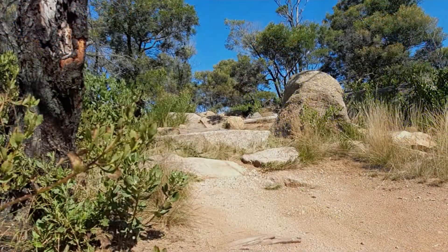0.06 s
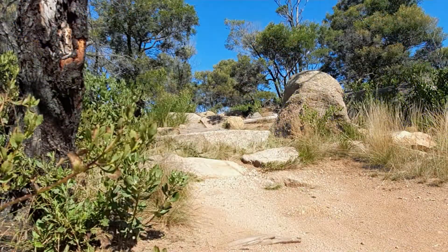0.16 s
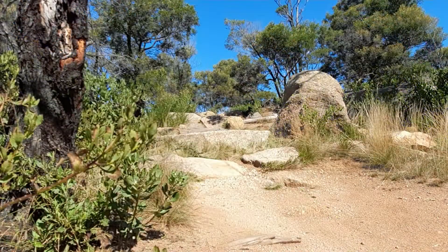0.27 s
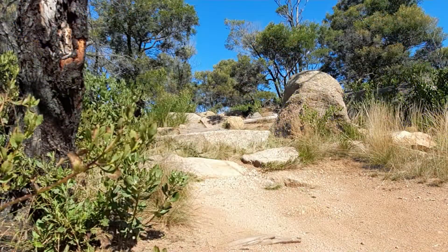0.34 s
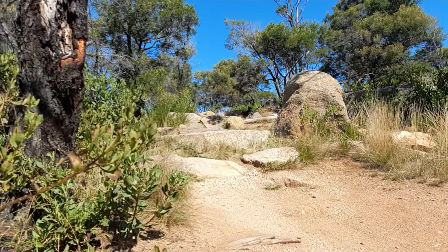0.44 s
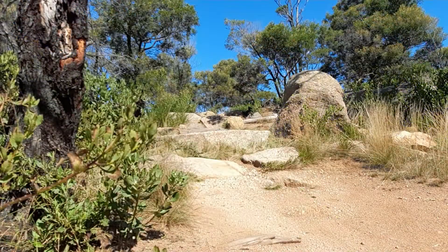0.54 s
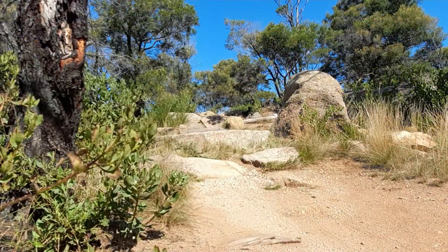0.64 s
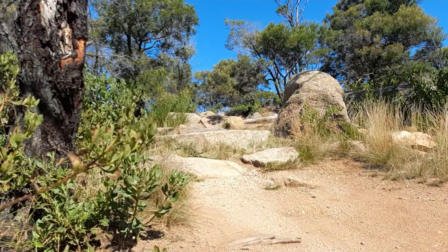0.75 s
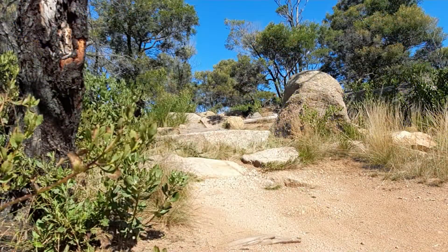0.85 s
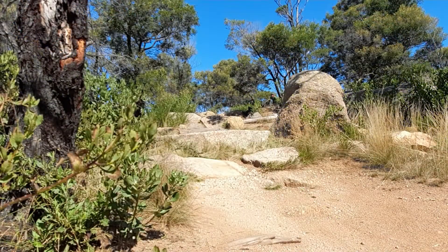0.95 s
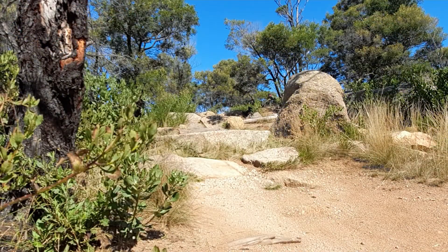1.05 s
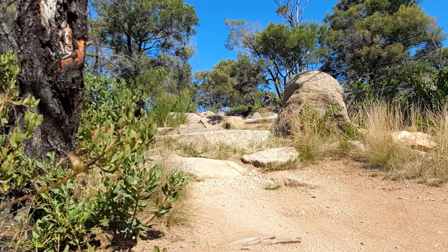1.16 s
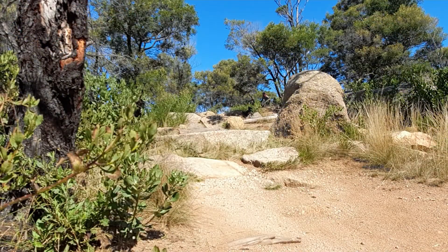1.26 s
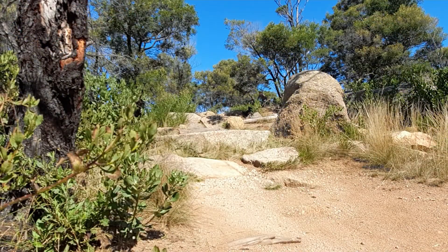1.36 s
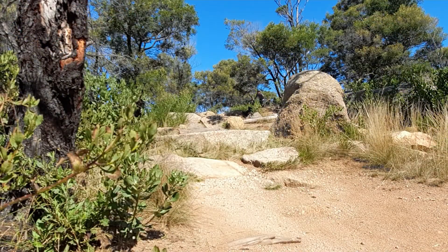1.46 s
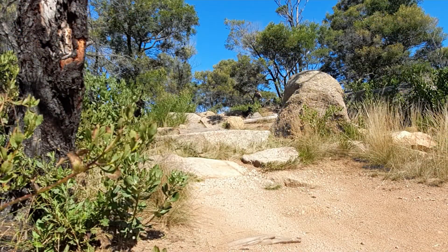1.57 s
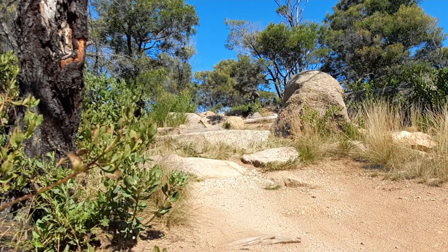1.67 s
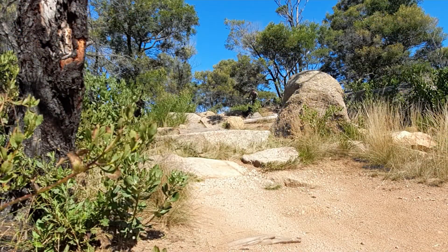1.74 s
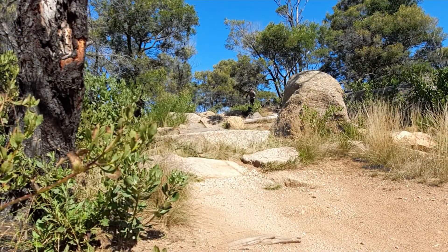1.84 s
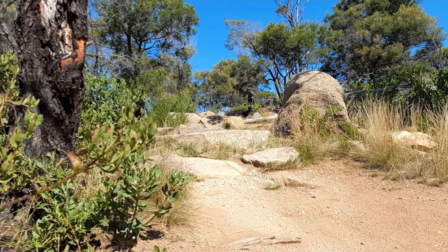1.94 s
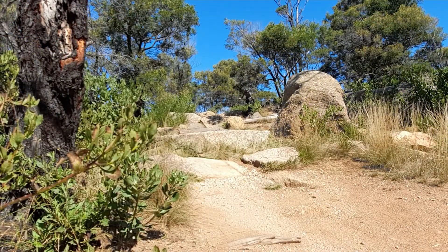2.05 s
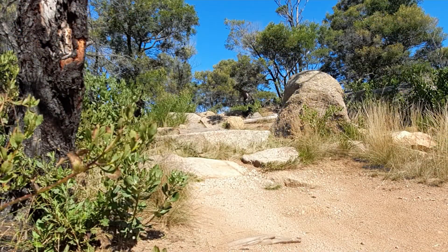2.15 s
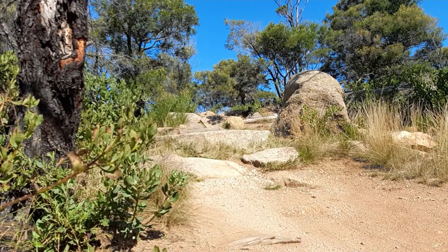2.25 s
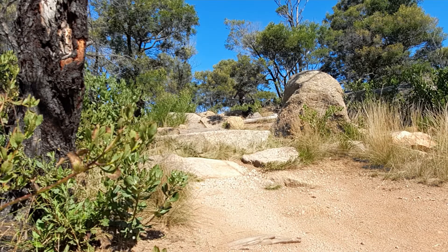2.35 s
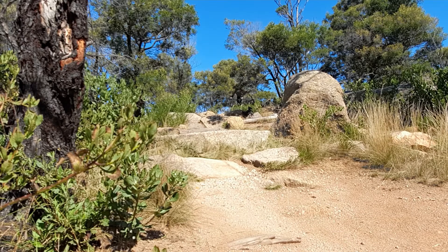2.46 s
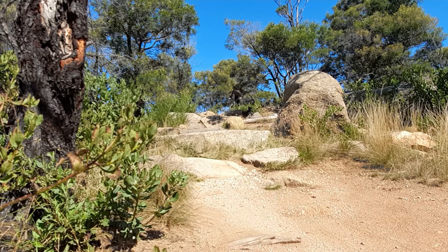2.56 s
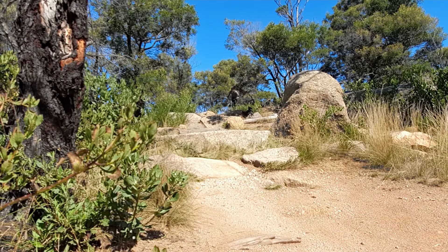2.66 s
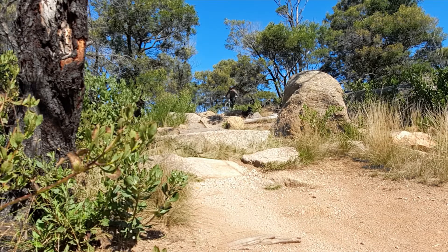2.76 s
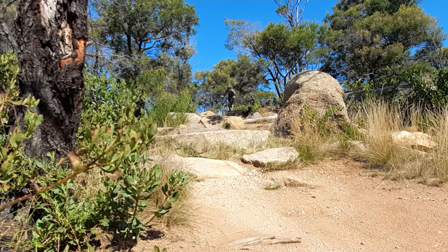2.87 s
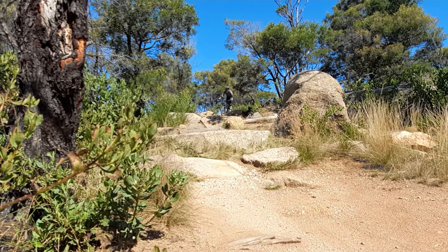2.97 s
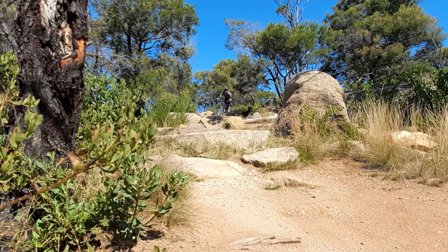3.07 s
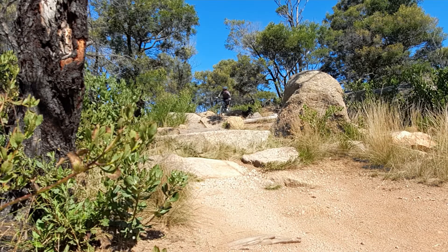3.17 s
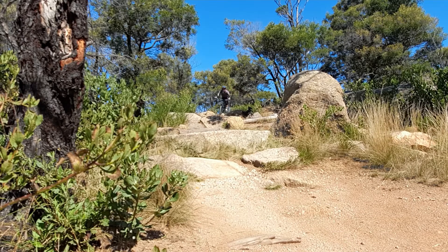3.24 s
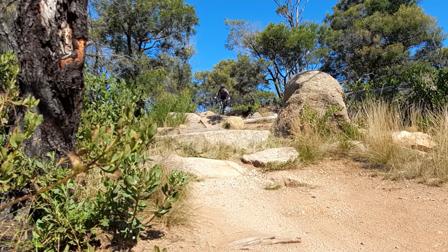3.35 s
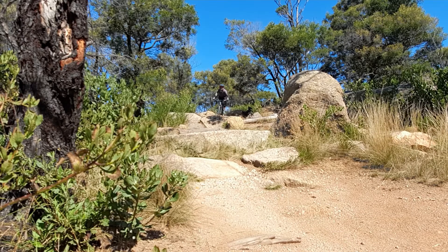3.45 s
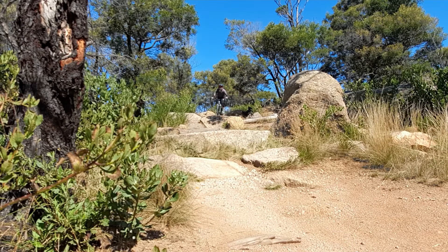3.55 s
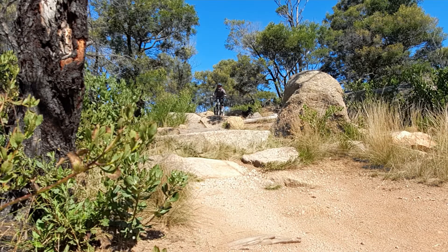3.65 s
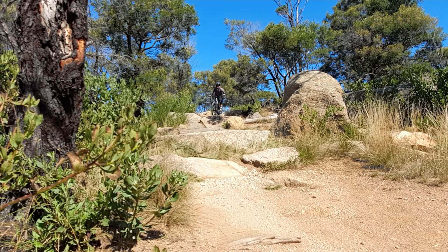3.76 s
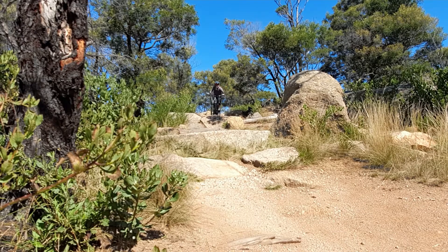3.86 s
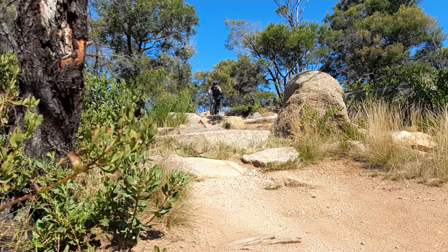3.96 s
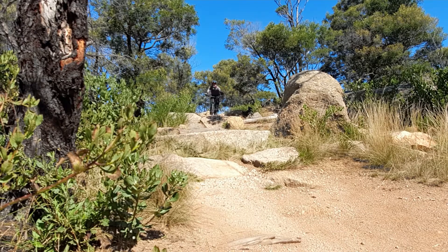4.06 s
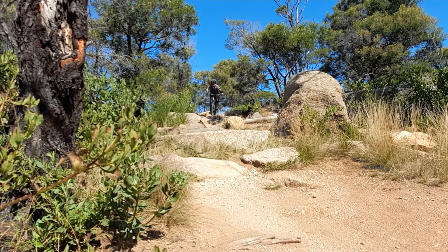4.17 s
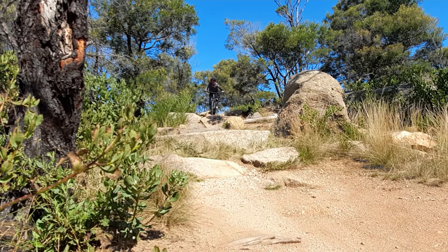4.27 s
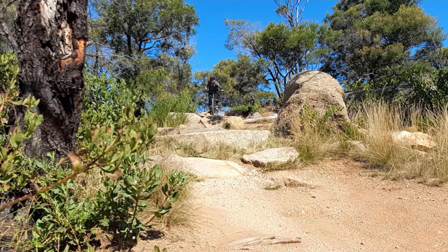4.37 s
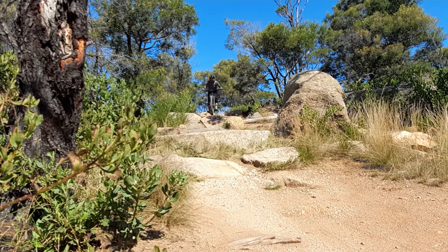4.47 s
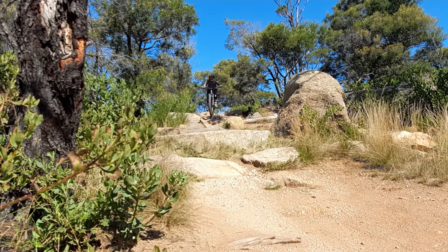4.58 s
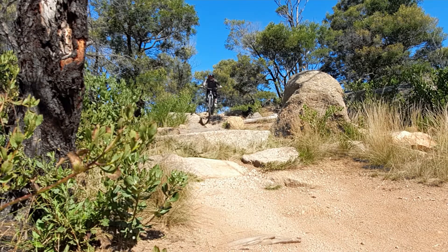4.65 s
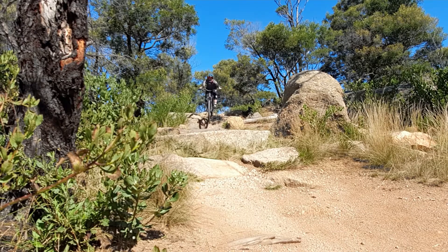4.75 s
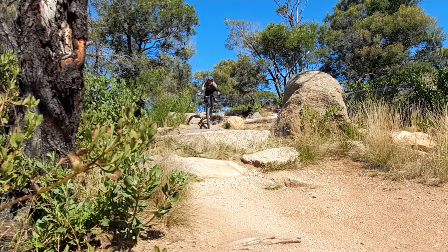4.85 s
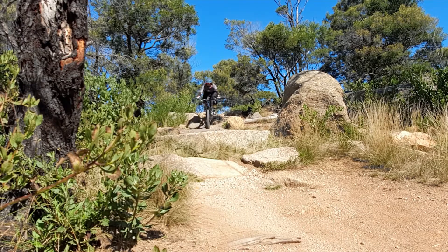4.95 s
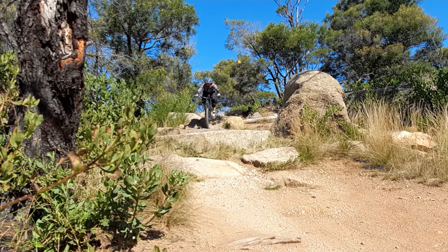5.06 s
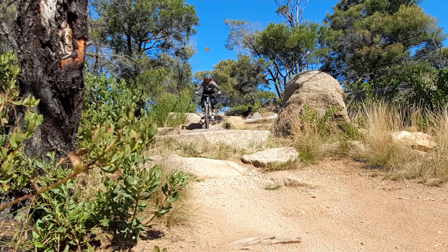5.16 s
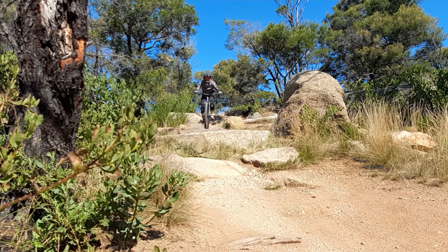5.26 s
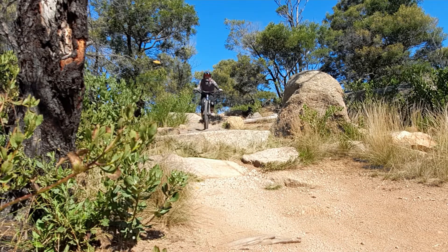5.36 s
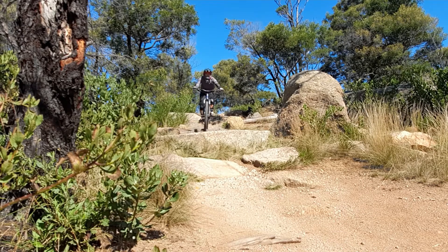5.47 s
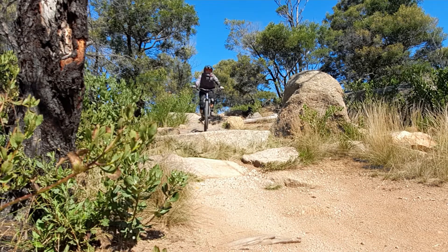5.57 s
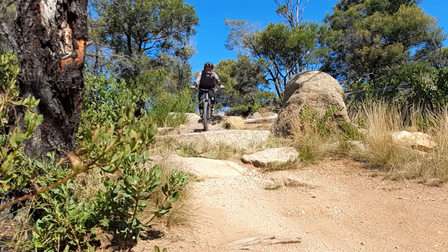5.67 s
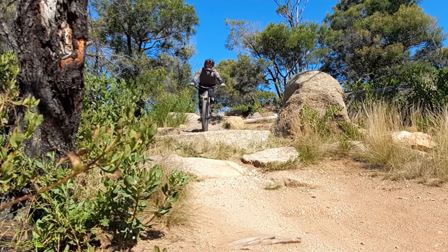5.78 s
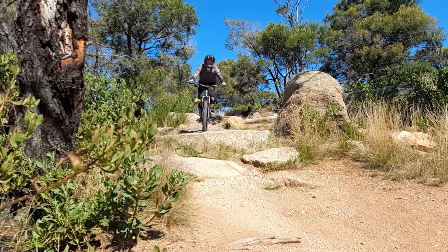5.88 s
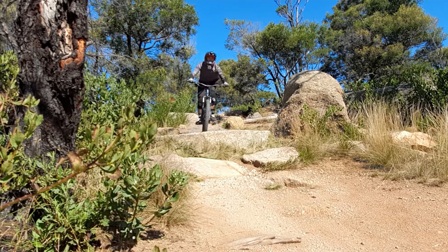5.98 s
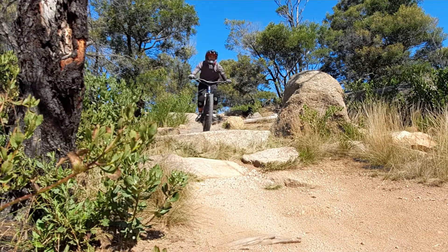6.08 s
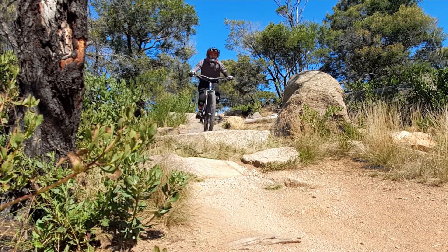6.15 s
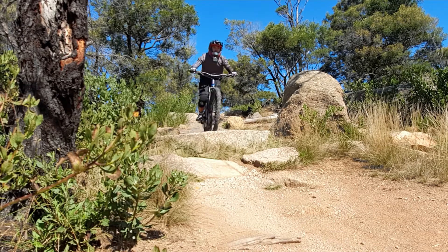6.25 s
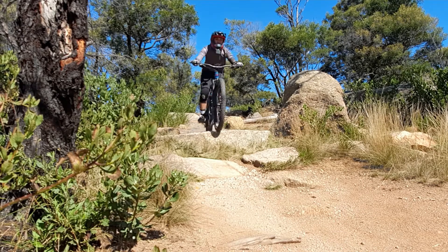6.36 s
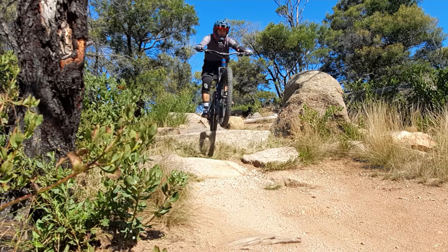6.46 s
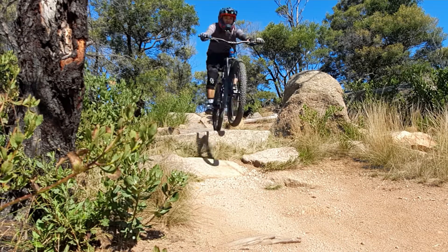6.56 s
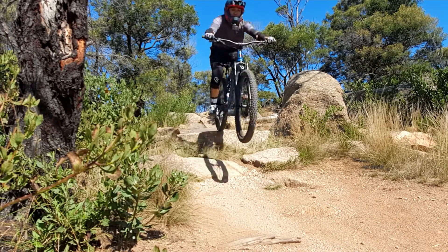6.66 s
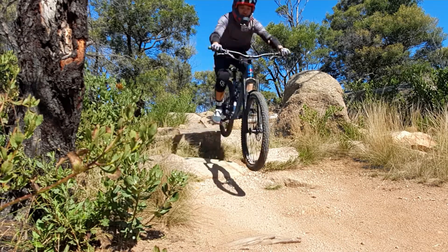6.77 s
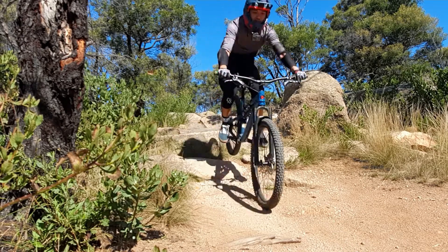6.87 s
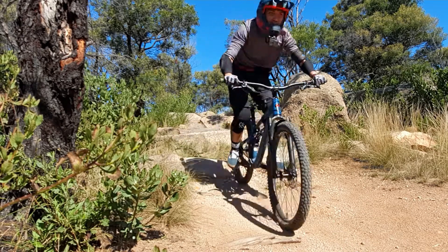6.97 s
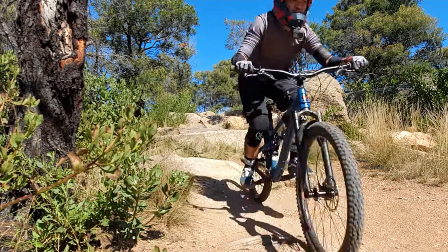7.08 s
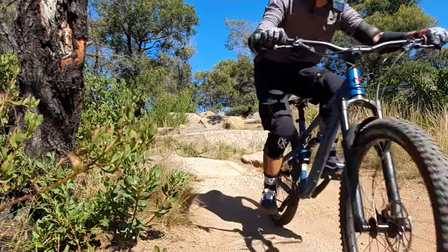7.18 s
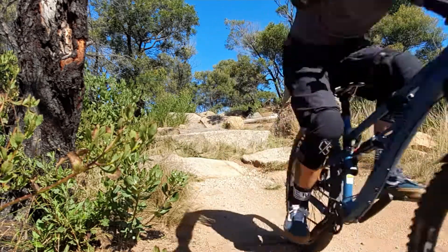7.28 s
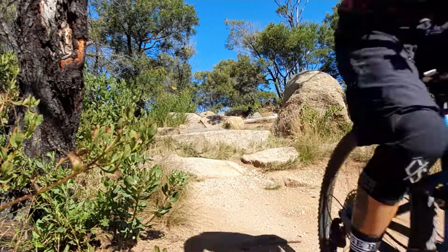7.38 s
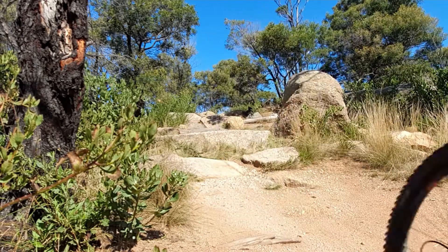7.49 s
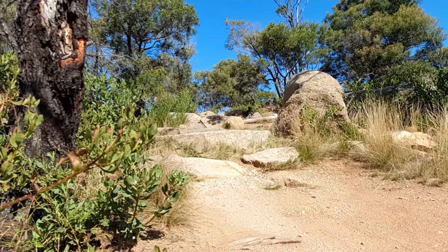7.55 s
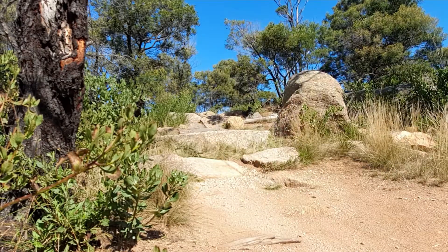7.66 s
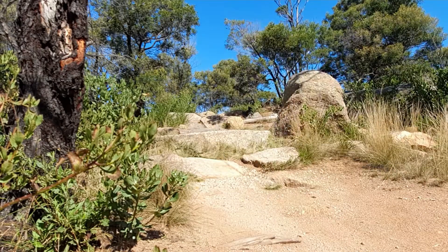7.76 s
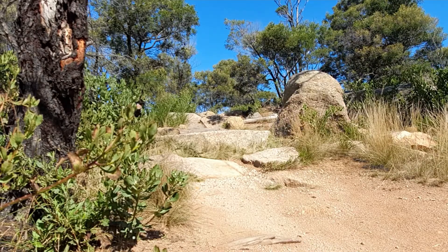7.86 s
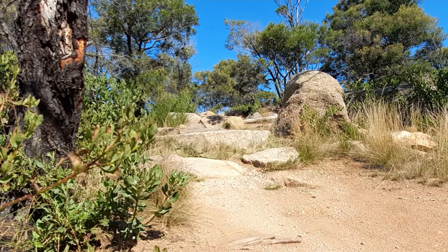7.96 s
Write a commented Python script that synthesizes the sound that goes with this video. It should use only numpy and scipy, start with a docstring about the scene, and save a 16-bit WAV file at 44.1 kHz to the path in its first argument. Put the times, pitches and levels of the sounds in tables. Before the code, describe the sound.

Over a low distant propeller drone, bike tyres knock and grind nearer, fall silent in a jump, crunch down hard and pass close on the right.

```python
"""All along, a far engine, probably a propeller plane, drones and sinks in pitch: a few wavering sine overtones.
A mountain bike nears on a sandy, rocky trail: cracking grains for grit, noise bursts and rings for knocks,
chain slaps and freehub ticks. It hops near 5 s, ticks unevenly, then jumps a ledge at 6.69 s, nearly silent in the air.
It lands at 6.85 s with a heavy crunch and passes close on the right near 7.5 s. The bush adds a short echo."""
import sys
import numpy as np
from scipy import signal
from scipy.fft import rfft, irfft, next_fast_len
from scipy.io import wavfile
from scipy.ndimage import uniform_filter1d, map_coordinates

SR = 44100
rng = np.random.default_rng(int(sys.argv[2]) if len(sys.argv) > 2 else 0)


def bounce(signal):
    """Save signal as a 16-bit WAV file at the path given by the first command-line argument."""
    frames = np.transpose(np.atleast_2d(signal))
    limited = np.clip(frames, -1, 1)
    pcm = np.round(limited * 32767).astype(np.int16)
    wavfile.write(sys.argv[1], SR, pcm)


N = 353726
TIME = np.arange(N) / SR


def undb(db):
    """Decibels to gain."""
    return 10 ** (np.asarray(db) / 20)


def curve(rows, axis=1):
    """One column of a table, joined by straight lines in time."""
    rows = np.asarray(rows)
    return np.interp(TIME, rows[:, 0], rows[:, axis])


def swell(s, half_s):
    """A smooth rise and fall around one moment; top 1."""
    return np.exp(-((TIME - s) / half_s) ** 2)


def noise():
    """Two unrelated white noises."""
    return rng.standard_normal((2, N))


def walk(rate):
    """Random levels held 1 / rate s and smoothed twice; spread 1."""
    k = max(int(SR / rate), 2)
    held = np.repeat(rng.standard_normal(N // k + 1), k)
    smooth = uniform_filter1d(uniform_filter1d(held, k), k)[:N]
    return smooth / smooth.std()


def response(points, size):
    """Gain at each frequency bin from (Hz, dB) points, joined on a log frequency scale."""
    hz, db = np.transpose(points)
    bins_hz = np.arange(size // 2 + 1) * SR / size
    return undb(np.interp(np.log(bins_hz + 1), np.log(hz), db))


def colour(x, points):
    """Filter that never sounds before its input and keeps the power of white noise."""
    size = next_fast_len(N + SR // 2, real=True) // 2 * 2
    gain = response(points, size)
    # folding the cepstrum gives the filter its minimum phase
    cepstrum = irfft(np.log(gain / np.sqrt(np.mean(gain ** 2))))
    cepstrum[1:size // 2] *= 2
    cepstrum[size // 2 + 1:] = 0
    return irfft(rfft(x, size) * np.exp(rfft(cepstrum)), size)[..., :N]


# How far the two microphone ports differ.
# Each row: frequency in Hz, side level against the middle in dB.
STEREO_WIDTH = [(300, -13), (1000, -7.5), (2800, -5), (6000, -0.5)]


def ports(pair, points):
    """Colour two excitations into left and right: alike in the bass, apart in the treble."""
    mid, side = colour(pair, points)
    size = next_fast_len(2 * (N // 2 + 1), real=True) * 2
    side = irfft(rfft(side, size) * response(STEREO_WIDTH, size), size)[:N]
    return np.array([mid + side, mid - side])


def grains(per_s, spread_db):
    """Grains cracking at random, many small and a few large; unit power."""
    size = undb(spread_db * np.minimum(rng.exponential(size=N), 4))
    cracks = (rng.random(N) < per_s / SR) * size
    # each crack dies away within a few samples
    power = signal.lfilter([1], [1, -.8], cracks ** 2)
    x = noise() * np.sqrt(power + 1e-18)
    return x / x.std()


def blows(times, peaks_db, decays_s, rise_s):
    """Envelope of blows that rise quickly and die away; their powers add."""
    power, t = np.zeros(N + SR), np.arange(SR // 4) / SR
    for s, db, decay, rise in np.broadcast(times, peaks_db, decays_s, rise_s):
        shape = (1 - np.exp(-t / rise)) * np.exp(-t / decay)
        start = int(np.clip(s * SR, 0, N))
        power[start:start + len(t)] += (undb(db) * shape / shape.max()) ** 2
    return np.sqrt(power[:N])


def pings(times, peaks_db, hz, decays_s):
    """Struck modes, each a sine that dies away."""
    out, t = np.zeros(N + SR), np.arange(SR // 12) / SR
    phases = rng.uniform(0, 2 * np.pi, N)
    for (s, db, f, decay), phase in zip(np.broadcast(times, peaks_db, hz, decays_s), phases):
        start = int(np.clip(s * SR, 0, N))
        age = t[t < np.log(1000) * decay]
        fade = np.exp(-age / decay) * (1 - np.exp(-2 * f * age))
        out[start:start + len(age)] += undb(db) * np.sin(2 * np.pi * f * age + phase) * fade
    return out[:N]


def resonance(x, hz, width_hz):
    """One steep resonance, the same peak filter twice; unit power."""
    b, a = signal.iirpeak(hz, hz / (2 * width_hz), fs=SR)
    ring = signal.lfilter(b, a, signal.lfilter(b, a, x))
    return ring / ring.std()


# Colour of the still air. Each row: frequency in Hz, relative level per Hz in dB.
AIR_COLOUR = [(20, -26.5), (62, 10), (130, -1), (300, -3.5), (700, -35), (1500, -41), (7000, -49.5),
              (16000, -58.5)]


def bush_air(air_db=-48):
    """Still bush air: soft coloured noise whose level wanders a little."""
    return ports(noise(), AIR_COLOUR) * undb(air_db + walk(7.4))


# Loudness of the far engine's rush. Each row: time in seconds, level in dB before random swells.
RUSH_LEVEL = [(0, -62.5), (1.35, -50.5), (2.2, -61.5), (2.8, -55.5), (4.2, -60)]
# Colour of the rush. Each row: frequency in Hz, relative level per Hz in dB.
RUSH_COLOUR = [(100, -20), (300, 3.5), (430, -3.5), (500, -12.5), (640, -7), (850, -27), (2000, -54.5)]


def engine_rush(swell_db=1.5, upper_hz=520, brighten=0.43):
    """The far engine's noise, whose upper part grows faster than the rest as it swells."""
    level_db = curve(RUSH_LEVEL) + swell_db * walk(9.2)
    rush = ports(noise(), RUSH_COLOUR)
    low = signal.sosfiltfilt(signal.butter(4, upper_hz, fs=SR, output="sos"), rush)
    rush = low + (rush - low) * undb(brighten * (level_db - level_db.mean()))
    return rush * undb(level_db)


# Sinking pitch of the drone. Each row: time in seconds, pitch in Hz.
DRONE_PITCH = [(0, 103.5), (1.3, 101), (3, 99.7), (4.5, 99.32), (6, 96.78), (8, 93.78)]
# Loudness of the drone. Each row: time in seconds, level in dB before wavering and overtone levels.
DRONE_LEVEL = [(0.1, -30), (2.12, -29.5), (2.36, -31.5), (2.9, -30.5), (3.79, -34), (5.64, -27),
               (6.8, -28.5), (7.3, -31), (8.02, -36.5)]
# Overtones. Each row: multiple of the pitch, level in dB at the start, level in dB at the end.
DRONE_OVERTONES = [(1, 0.5, -1.5), (2, -12, -20), (3, -32, -35.5)]


def drone(overtone_waver_db=2.1):
    """A nearly pure propeller tone; the air on the way makes the higher overtones waver."""
    phase = 2 * np.pi * np.cumsum(curve(DRONE_PITCH)) / SR
    tone = 0
    for multiple, first_db, last_db in DRONE_OVERTONES:
        waver_db = overtone_waver_db * (multiple - 1) * walk(4.4)
        db = np.linspace(first_db, last_db, N) + waver_db
        tone = tone + undb(db) * np.cos(multiple * phase)
    tone = np.sqrt(2) * tone * undb(curve(DRONE_LEVEL) + .4 * walk(12))
    # the left is 1 dB louder than the right
    return tone * undb(np.array([[.5], [-.5]]))


# the wheels in the air: lift-off in s, touchdown in s, change of level in dB
HOP, JUMP = (4.88, 5.03, -7), (6.69, 6.853, -36.5)
# the ride is a straight line past the microphone: m/s, m, s; scrub swallows extra sound with every metre
SPEED_M_S, CLOSEST_M, PASSES_S, SCRUB_DB_PER_M = 4.226, 1.436, 7.47, 1.13


def bush(x, far_wet_db=-4.0, near_wet_db=-16, t60_s=0.28):
    """Trunks and boulders scatter a short tail, whose share falls as the bike comes close."""
    t = np.arange(SR // 2) / SR
    tail = rng.standard_normal((2, len(t))) * undb(-60 * t / t60_s) * (1 - np.exp(-t / 0.0022))
    tail /= np.sqrt(np.sum(tail ** 2, axis=1, keepdims=True))
    wet = undb(np.interp(TIME, [2, JUMP[1]], [far_wet_db, near_wet_db]))
    return signal.fftconvolve(x * wet, tail, axes=1)[:, :N]


def distance_db():
    """Level against the closest point: the sound spreads out and the scrub absorbs it."""
    metres = np.hypot(SPEED_M_S * (TIME - PASSES_S), CLOSEST_M)
    return -20 * np.log10(metres / CLOSEST_M) - SCRUB_DB_PER_M * (metres - CLOSEST_M)


def airborne_db(unload_s=0.14, contact_s=0.0027):
    """The bike falls quiet as it leaves the ground and is back at once on touchdown."""
    total_db = 0
    for lift, down, db in (HOP, JUMP):
        leaving = np.clip((TIME - lift) / unload_s, 0, 1)
        still_up = np.clip((down - TIME) / contact_s, 0, 1)
        total_db = total_db + db * leaving * still_up
    return total_db


# Brake disc brushing its pads harder.
# Each row: time in seconds, level in dB before chatter, half length in seconds, resonance in Hz.
DISC_RUBS = [(1.19, -70, 0.033, 9400), (1.67, -76, 0.065, 2840), (2.364, -74.5, 0.084, 2820),
             (4.232, -68, 0.042, 2720), (6.575, -45.5, 0.049, 2710)]


def brake_disc(ring_hz=2830, sharpness=13, chatter_db=3, drag_db=-43):
    """Light pad contact makes the steel disc sing all along; harder rubs pick their own resonance."""
    drag = undb(drag_db + distance_db() + airborne_db())
    sing = resonance(noise(), ring_hz, ring_hz / sharpness) * drag
    friction = noise()
    for s, db, half_s, hz in DISC_RUBS:
        sing = sing + resonance(friction, hz, hz / sharpness) * undb(db) * swell(s, half_s)
    return sing * undb(chatter_db * walk(60))


# Speed of the freehub as the wheel overruns the pedals. Each row: time in seconds, ticks per second.
TICK_RATE = [(4.3, 38), (6.25, 75), (6.45, 35.3), (6.7, 39), (7.0, 127.9), (7.38, 108), (7.44, 24.3),
             (7.56, 85.7), (7.6, 47.8), (7.72, 43.2), (8.02, 39.3)]
# Uneven, louder freehub ticks just before the jump.
# Each row: time in seconds, peak in dB before the common trim.
UNEVEN_TICKS = [(6.446, -39), (6.464, -36.5), (6.504, -34.5), (6.533, -36.5), (6.555, -34), (6.574, -34),
                (6.593, -33.5), (6.627, -34.5), (6.659, -35), (6.69, -39.5)]
# Ringing pitches of the hub shell in Hz, before each tooth's shift.
HUB_RINGS_HZ = [2460, 2590, 2850]
# Colour of a pawl's tick. Each row: frequency in Hz, relative level per Hz in dB.
PAWL_COLOUR = [(1200, -31.5), (2200, 0.5), (2800, 5.5), (4200, 0.5), (5600, 0), (7000, 0.5), (8300, -8),
               (10000, 0.5), (11300, -5), (13300, 5), (14400, 2.5), (15400, -0.5), (16500, -19)]


def freehub(hub_db=-28.5, tick_s=0.0052, starts_s=2.6, facing_db=8, facing_at_s=7.56, facing_s=0.15,
            hidden_db=-6, clearing_db=15.5, jolt_s=0.0029, jolt_db=3, uneven_trim_db=-5.0,
            ring_db=-13, ring_s=0.012, ring_scatter=.03, ring_fall=0.068, hurry_db_per_octave=0.5):
    """Pawls drop into the ratchet tooth by tooth and ring the hub, unevenly over the rocks."""
    rate = curve(TICK_RATE)
    teeth = np.cumsum(rate) / SR
    # one tooth falls at this very moment
    teeth -= np.interp(7.5205, TIME, teeth)
    drops = np.flatnonzero((np.diff(np.floor(teeth)) > 0) & (TIME[1:] > starts_s))
    on_rocks = TIME < JUMP[1]
    # the bike screens the hub until it draws level
    exposed_db = facing_db * swell(facing_at_s, facing_s) + np.interp(TIME, [7.25, 7.42], [hidden_db, 0])
    # far up the trail there is a clear line of sight to the hub
    exposed_db = exposed_db + clearing_db * swell(3.01, 0.36)
    # the faster the teeth come, the less the pawls spring back
    exposed_db = exposed_db - hurry_db_per_octave * np.log2(rate / rate[-1])
    late, strength = noise()
    jolts_db = (.5 + jolt_db * on_rocks) * strength
    db = (hub_db + distance_db() + airborne_db() + exposed_db + jolts_db)[drops]
    s = (TIME + jolt_s * on_rocks * late)[drops]
    # the uneven ticks replace the regular ones
    uneven_s, uneven_db = np.transpose(UNEVEN_TICKS)
    regular = (s < uneven_s[0]) | (s > uneven_s[-1])
    s, db = np.r_[uneven_s, s[regular]], np.r_[uneven_db + uneven_trim_db, db[regular]]
    # the ring differs from tooth to tooth and sinks as the bike goes by
    scatter = ring_scatter * rng.standard_normal(len(s))
    shift = 1 + scatter - ring_fall * np.tanh((s - facing_at_s) / facing_s)
    shell = pings(s[:, None], db[:, None] + ring_db, np.outer(shift, HUB_RINGS_HZ), ring_s)
    return ports(noise() * blows(s, db, tick_s, rise_s=0.00025), PAWL_COLOUR) + shell


# The chain slapping the frame.
# Each row: time in seconds, peak in dB before the slap and ring trims, strongest ring in Hz.
CHAIN_SLAPS = [(1.806, -44.5, 7590), (1.85, -43.5, 5900), (1.901, -40.5, 6000), (2.647, -38, 3980),
               (2.764, -45.5, 7250), (2.841, -39, 7200), (2.858, -38, 5560), (3.431, -44, 3650),
               (3.486, -48, 3800), (3.753, -41.5, 5000), (4.401, -41, 5630), (4.723, -39, 3650),
               (5.238, -26, 3600), (5.289, -34, 4000), (5.363, -35.5, 3980), (5.832, -33.5, 3375),
               (5.857, -33.5, 5150), (5.912, -28.5, 3360), (6.047, -31, 5830), (6.276, -28.5, 5500),
               (6.405, -29.5, 5190), (6.889, -20, 7590), (6.978, -23.5, 3650)]
# Ringing pitches of sprockets and frame after a slap, in Hz.
FRAME_RINGS_HZ = [3370, 3710, 4005, 5180, 5500, 5930, 6700, 7500]
# Colour of the slap. Each row: frequency in Hz, relative level per Hz in dB.
CHAIN_COLOUR = [(500, -2), (2000, -2), (2800, -3.5), (3800, 7), (6800, 5), (8500, 1.5), (10000, 3.5),
                (16000, -22)]


def chain_slaps(slap_db=-7.5, decay_s=0.0041, ring_db=-8, ring_s=0.0072, focus_db_per_octave=70,
                link_s=.028, link_db=-12):
    """The chain slaps the frame; where it lands decides which modes ring most."""
    s, db, hz = np.transpose(CHAIN_SLAPS)
    # two loose links rattle on after every slap
    link_times = s + link_s * rng.exponential(size=(2, len(s)))
    s = np.r_[s, link_times.ravel()]
    db = np.r_[db, np.tile(db + link_db, 2)]
    hz = np.tile(hz, 3)
    chain = ports(noise() * blows(s, db + slap_db, decay_s, rise_s=0.00056), CHAIN_COLOUR)
    for mode_hz in FRAME_RINGS_HZ:
        off_db = np.minimum(focus_db_per_octave * abs(np.log2(mode_hz / hz)), 17)
        chain = chain + pings(s, db + ring_db - off_db, mode_hz, ring_s)
    return chain


# Pebbles snapping out from under the tread. Each row: time in seconds, peak in dB before the trim.
PEBBLES = [(7.2737, -11)]
# Colour of fine sand and pebbles. Each row: frequency in Hz, relative level per Hz in dB.
SAND_COLOUR = [(1500, -6), (3500, 3.5), (6800, 7), (8400, -1), (13700, -0.5), (16000, -4)]


def pebbles(pebble_db=-1, decay_s=0.00025):
    """A single pebble snaps: a very short burst of bright noise."""
    s, db = np.transpose(PEBBLES)
    return ports(noise() * blows(s, db + pebble_db, decay_s, rise_s=.0001), SAND_COLOUR)


# Wheels bottoming after drops. Each row: time in seconds, peak of the envelope in dB.
THUDS = [(5.24, -32), (5.345, -33), (5.846, -30), (5.959, -29), (6.199, -29), (6.856, -26), (6.905, -17),
         (6.988, -30), (7.29, -32), (7.44, -28)]


def thuds(thud_hz=62, swell_s=0.0062):
    """After each drop the soft tyre bounces for a cycle or two against the ground."""
    out = 0
    for s, db in THUDS:
        t = np.maximum(TIME - s, 0)
        envelope = t / swell_s * np.exp(1 - t / swell_s)
        out = out + undb(db) * np.sin(2 * np.pi * thud_hz * t) * envelope
    return out


# Tyres striking rock. Each row: time in seconds, peak in dB before the trims, pitch of the stone in Hz.
KNOCKS = [(0.28, -55, 1644), (0.544, -45, 1413), (1.466, -48, 1400), (1.49, -51.5, 2180),
          (2.138, -56, 1490), (2.566, -51, 1564), (3.071, -45, 840), (3.355, -54, 1296), (3.588, -36, 795),
          (3.626, -45, 1820), (4.1, -53, 1800), (4.321, -46, 1150), (4.437, -42.5, 2192), (4.856, -38, 935),
          (5.157, -28, 2170), (5.22, -33.5, 710), (5.288, -37, 2570), (5.342, -32.5, 417),
          (5.513, -32, 570), (5.671, -36.5, 1490), (5.893, -31.5, 790), (5.96, -26, 640),
          (5.986, -30.5, 700), (6.056, -29.5, 2010), (6.298, -32, 1290), (6.854, -18, 794),
          (6.895, -15, 2050), (6.909, -12.5, 656), (6.969, -16, 1900), (7.005, -12, 894),
          (7.127, -19.5, 1240), (7.211, -15, 553), (7.297, -15, 890), (7.634, -20.5, 480)]
# Modes of a struck stone. Each row: multiple of its pitch, relative level in dB.
STONE_RINGS = [(1, -2.5), (1.6, -8.5)]
# Colour of big stones. Each row: frequency in Hz, relative level per Hz in dB.
ROCK_COLOUR = [(80, -24), (300, 9.5), (800, 3), (1100, -0.5), (1600, 0.5), (3500, -14), (15000, -41.5)]
# Colour of small stones, and of grit while the bike is ahead.
# Each row: frequency in Hz, relative level per Hz in dB.
GRIT_AHEAD_COLOUR = [(150, -11.5), (450, -1.5), (750, -3), (1400, -0.5), (2100, -1.2), (3400, -4),
                     (7000, -23), (15000, -26)]


def knocks(knock_db=-10.5, clear_s=5, far_decay_s=0.025, near_decay_s=0.012, far_rise_s=0.024,
           near_rise_s=.001, rebound_s=.035, far_rebound_db=-3, near_rebound_db=-15, ring_db=-7,
           far_ring_db=2, far_ring_s=0.014, near_ring_s=.005, dull_hz=900, bright_hz=2400):
    """Tyres strike stone and rebound: big stones clonk, small ones crack; distance blurs each blow."""
    s, db, hz = np.transpose(KNOCKS)
    rebound_db = np.interp(s, [0, clear_s], [far_rebound_db, near_rebound_db])
    s, db, hz = np.r_[s, s + rebound_s], np.r_[db, db + rebound_db], np.r_[hz, hz]

    def blur(far, near):
        """Slide from the far setting to the near one as the bike comes closer."""
        return np.interp(s, [0, clear_s], [far, near])

    decay_s, rise_s = blur(far_decay_s, near_decay_s), blur(far_rise_s, near_rise_s)
    bright = np.interp(hz, [dull_hz, bright_hz], [0, 1]) * blur(0, 1)
    out = 0
    for ratio, mode_db in STONE_RINGS:
        peak_db = db + ring_db + mode_db + blur(far_ring_db, 0)
        out = out + pings(s + rise_s / 2, peak_db, hz * ratio, blur(far_ring_s, near_ring_s))
    for share, spectrum in ((1 - bright, ROCK_COLOUR), (bright, GRIT_AHEAD_COLOUR)):
        push = blows(s, db + knock_db + 10 * np.log10(share + 1e-18), decay_s, rise_s)
        out = out + ports(grains(per_s=5000, spread_db=0) * push, spectrum)
    return out


def gravel(per_s, spread_db=3, low_hz=380, high_hz=5600, cycles=2.2, tilt_db_per_octave=2.0):
    """Stones crack under the tread, each at its own pitch for a few cycles; unit power."""
    hit = np.flatnonzero(rng.random(N) < per_s / SR)
    octaves = rng.random(len(hit)) * np.log2(high_hz / low_hz)
    size = np.minimum(rng.exponential(size=len(hit)), 3)
    hz = low_hz * 2 ** octaves
    x = pings(TIME[hit], spread_db * size + tilt_db_per_octave * octaves, hz, cycles / hz)
    return x / x.std()


# Patches of loose ground.
# Each row: time in seconds, half length in seconds, extra grinding in dB, extra sand hiss in dB.
PATCHES = [(1.179, 0.1, 5, 25.5), (1.87, 0.3, 11, 19), (2.849, 0.4, 0, 17), (3.702, 0.17, 12.5, 16.5),
           (4.674, 0.23, 1, 11), (5.287, 0.19, 6, 12.5), (6.37, 0.095, 4, 7.5), (7.401, 0.065, 2.5, 7.5),
           (7.885, 0.099, 5.5, -6)]
# Colour of grit once the bike is beside us. Each row: frequency in Hz, relative level per Hz in dB.
GRIT_BESIDE_COLOUR = [(150, -22), (450, 0.5), (900, 2.5), (1400, -0.5), (2300, -0.5), (3000, -0.5),
                      (3800, -3.5), (4800, -14.5), (15000, -45)]
# Rumble of the tyre casings. Each row: frequency in Hz, relative level per Hz in dB.
CASING_COLOUR = [(55, -13.5), (110, -4.5), (255, -3.5), (284, 9), (315, -5.5), (420, -10), (1500, -37)]
# rolling on firm ground at the closest point, before load, crest and patches
GRIND_DB, SAND_DB = -32.5, -41
# a crest holds the grinding down until the bike comes over it
CREST_S, CREST_DB = 4.36, -9
# landing presses the tyres into the ground; the load then eases
LANDING_GRIND_DB, LANDING_SAND_DB, LANDING_S = 11, 1.5, 0.46
# before the jump the front wheel lifts first, and the rear tyre rolls on alone
FRONT_LIFTS_S, ONE_WHEEL_DB = 6.46, -8


def tyres(patchy_db=2.0, lull_db=3.5, turn_s=0.13, casing_db=-21.0, casing_slope=0.51, crush_db=-1.0,
          stones_per_s=90, stone_db=-3, gravel_per_s=1200, gravel_db=-5):
    """Knobs crush grit, crack small stones and spray fine sand; the casings rumble under load."""
    landed = TIME > JUMP[1]
    load = landed * swell(JUMP[1], LANDING_S)
    beside = (1 + np.tanh((TIME - PASSES_S) / turn_s)) / 2
    ahead = 1 - beside
    # over bumps the tyres unload for a moment and fall into a lull
    lulls = lull_db * np.minimum(walk(35), 0) * ahead
    one_wheel = ONE_WHEEL_DB * (TIME > FRONT_LIFTS_S) * ~landed
    roll_db = distance_db() + airborne_db() + lulls + one_wheel
    grind_db = GRIND_DB + LANDING_GRIND_DB * load + CREST_DB * (TIME < CREST_S)
    sand_db = SAND_DB + LANDING_SAND_DB * load
    for s, half_s, more_grind_db, more_sand_db in PATCHES:
        grind_db = grind_db + more_grind_db * swell(s, half_s)
        sand_db = sand_db + more_sand_db * swell(s, half_s)
    grind, spray = undb(roll_db + grind_db), undb(roll_db + sand_db)
    # lone stones lie on the rock, a bed of gravel below the ledge
    lone_stones = gravel(stones_per_s) * undb(stone_db)
    gravel_bed = gravel(gravel_per_s) * undb(gravel_db)
    stones = np.where(landed, gravel_bed, lone_stones) * grind * ahead
    crush = grains(per_s=3000, spread_db=0) * undb(patchy_db * walk(170)) * grind
    grit_ahead = ports(crush * ahead * undb(crush_db), GRIT_AHEAD_COLOUR)
    grit_beside = ports(crush * beside, GRIT_BESIDE_COLOUR)
    sand = ports(grains(per_s=5100, spread_db=5.5) * spray, SAND_COLOUR)
    casing = ports(noise() * grind ** casing_slope * undb(casing_db), CASING_COLOUR)
    return grit_ahead + stones + grit_beside + sand + casing


def mottle(x, depth_db, per_s, count=15):
    """Each stone under the tread rings differently, so the colour keeps shifting from band to band."""
    size = next_fast_len(N + SR // 8, real=True)
    spectrum = rfft(x, size)
    bins_hz = np.fft.rfftfreq(size, 1 / SR)
    place = np.interp(np.log(bins_hz + 1), np.log([300, 9000]), [0, count - 1])
    out = 0
    for k in range(count):
        gain = undb(depth_db * walk(per_s))
        band = irfft(spectrum * np.maximum(1 - abs(place - k), 0), size)[:, :N]
        out = out + band * gain / np.sqrt(np.mean(gain ** 2))
    return out


# Direction of the bike. Each row: time in seconds, delay of the left port in milliseconds.
PORT_LAG = [(6.3, -0.041), (6.85, 0.047), (7.17, 0.081), (7.32, 0.33), (7.62, 0.347), (8.0, 0.2)]


def passing(x, shadow_db=5.5, shadow_hz=5000, widest_s=7.62, sweep_s=0.33):
    """As the bike goes by on the right, the left port hears it later and duller, the right brighter."""
    bearing = 1 / (1 + ((TIME - widest_s) / sweep_s) ** 2)
    low = signal.sosfilt(signal.butter(1, shadow_hz, fs=SR, output="sos"), x)
    treble_db = shadow_db * bearing * np.array([[-.5], [.5]])
    left, right = low + (x - low) * undb(treble_db)
    heard_s = TIME - curve(PORT_LAG) / 1000
    return np.array([map_coordinates(left, [heard_s * SR], order=3), right])


def scene():
    """The bike and its echoes over the distant drone."""
    ground = mottle(tyres() + knocks(), depth_db=2.2, per_s=65)
    bike = ground + chain_slaps() + pebbles() + freehub() + brake_disc()
    distant = drone() + engine_rush() + bush_air()
    return passing(bike) + bush(bike) + thuds() + distant


def record(dry):
    """The recorder cuts everything above 16 kHz."""
    return signal.sosfilt(signal.ellip(10, .2, 80, 16000, fs=SR, output="sos"), dry)


dry = scene()
out = record(dry)
bounce(out)
```